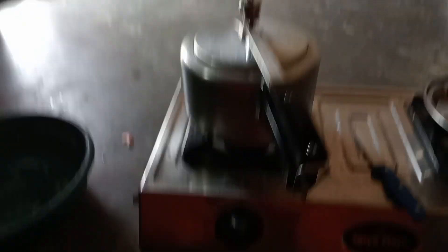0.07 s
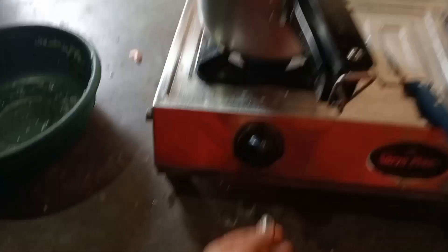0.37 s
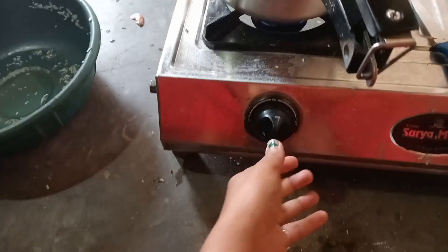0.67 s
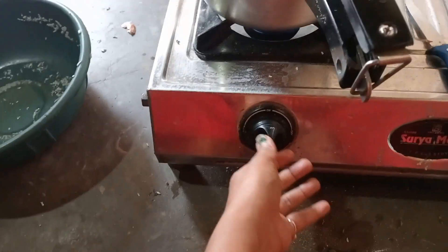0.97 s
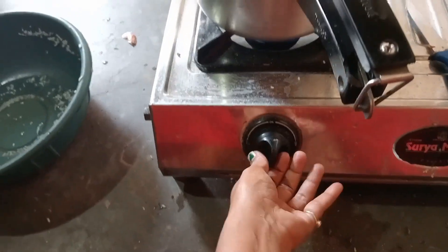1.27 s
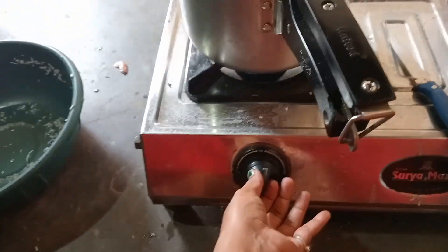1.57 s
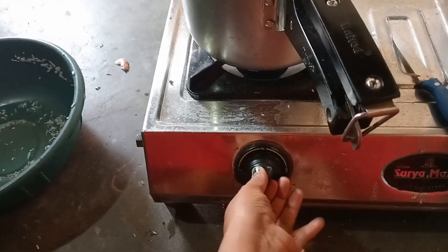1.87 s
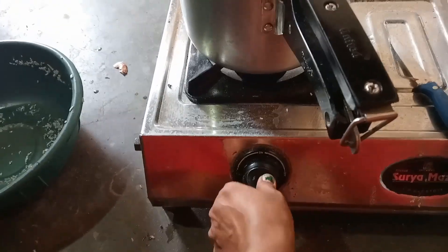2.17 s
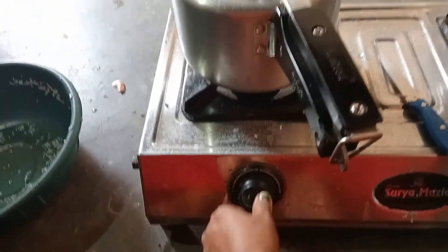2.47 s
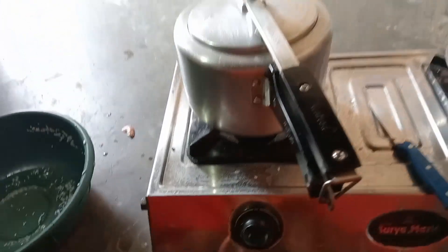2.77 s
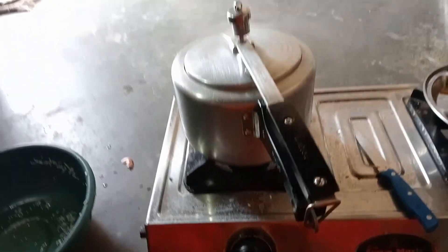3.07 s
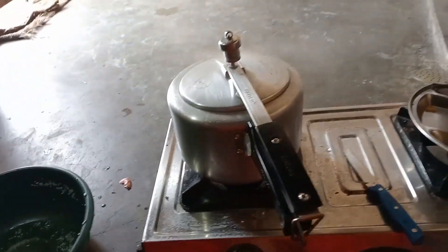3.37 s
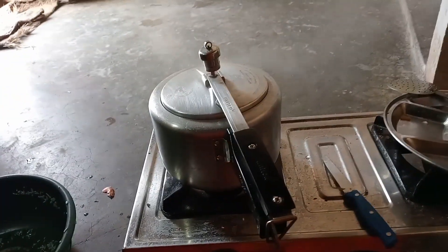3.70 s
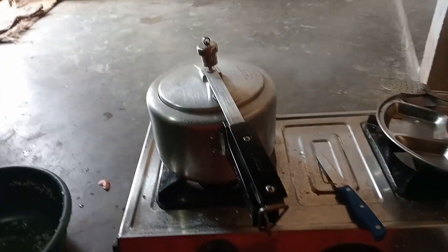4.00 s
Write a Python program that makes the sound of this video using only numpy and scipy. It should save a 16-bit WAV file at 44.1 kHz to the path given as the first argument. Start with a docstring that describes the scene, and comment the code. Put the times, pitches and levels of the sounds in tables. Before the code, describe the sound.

A loud, steady hiss of steam pours from a pressure cooker's valve from start to finish. It is sharp and airy, with a slight flutter and faint high whistling tones that come and go. The close, moving microphone catches dull little thumps of draught and extra fizz through the first three seconds, then the hiss softens slightly. A very faint low kitchen rumble lies underneath.

```python
"""A pressure cooker blows off steam under its weighted valve, on a gas stove, close to a hand-held mic.
The jet hisses through the vent's resonances and now and then almost whistles, while the valve flutters.
Nearby surfaces colour the hiss as the mic moves. Near the line of the jet the treble is brighter
and the draught buffets the mic. A faint kitchen rumble lies underneath."""
import sys
import numpy as np
from scipy import signal
from scipy.fft import rfft, irfft, next_fast_len
from scipy.io import wavfile
from scipy.ndimage import uniform_filter1d, map_coordinates

SR = 44100
rng = np.random.default_rng(int(sys.argv[2]) if len(sys.argv) > 2 else 0)


def transcribe(u):
    """Save the signal u as a 16-bit wav file named by the first command-line argument.

    u: samples, shape (n,) or (channels, n), limited to [-1, 1]; the rate is SR.
    q: integer samples, one column per channel.
    """
    v = np.clip(np.atleast_2d(u).T, -1, 1)
    q = np.round(v * 32767).astype(np.int16)
    wavfile.write(sys.argv[1], SR, q)


N = 187028

# How hard the jet blows. Each row: time in seconds, level in dB.
JET_LEVEL = [(0.0, -21), (0.13, -18.5), (1.2, -19), (2.0, -20), (2.7, -18.5), (3.3, -19.5), (4.24, -20.5)]
# The tone of the hiss. Each row: frequency in Hz, relative level in dB.
HISS_SPECTRUM = [(20, -72), (400, -39), (1100, -22), (1600, -17), (2200, -17), (2600, -8.5), (3050, -3.5),
                 (3700, -3.5), (5300, -3.5), (5850, -1), (7000, -2), (8000, -6), (9800, -17),
                 (11300, -15.5), (13000, -22.5), (15500, -24)]
# Brief dips in the jet's level. Each entry: centre in seconds.
DIP_TIMES = [.6, 4.3, 3.935]
def steam_jet():
    """Turbulent steam hisses out under the weight and sets vent, valve and lid ringing."""
    dip_db, dip_length_s = 2.2, 0.014
    jet_db = curve(JET_LEVEL) - dip_db * sum(swell(s, dip_length_s) for s in DIP_TIMES)
    hiss = amp(jet_db - 1.1) * eddies(noise(HISS_SPECTRUM), depth_db=1.61)
    ringing = amp(jet_db) * (vent_resonances() + valve_tones())
    return room(reflections(hiss, drift_s=0.0001346), wet_db=-14.5, t60=0.17) + ringing


def vent_resonances():
    """Two broad vent resonances: the low one fades as the mic nears the jet, the high one sings out once."""
    wander_db, wander_rate = 1.8, 3.97
    low_gain = near(closest_db=-17.5, slope=-0.31) * amp(wander_db * wobble(wander_rate))
    low = low_gain * resonance(hz=3117, half_width=290)
    high_db = -15.5 + 7.9 * swell(centre_s=1.7, length_s=0.76) + wander_db * wobble(wander_rate)
    high = amp(high_db) * resonance(hz=6620, half_width=200)
    return low + high


# The ring of valve and lid. Each row: pitch in Hz, half-width in Hz, relative level in dB.
VALVE_MODES = [(3976, 23, -17), (4976, 30, -16), (5410, 22, -21), (5720, 19, -19), (5935, 12, -11.5),
               (6050, 20, -12.5), (6360, 32, -11), (6480, 17, -18.5), (6900, 9.9, -16.5), (7080, 18, -14.5),
               (7490, 16, -20), (8752, 40, -16)]
def valve_tones():
    """Narrow resonances of the valve and lid, each swelling and fading on its own."""
    trim_db, wander_db = -5.0, 3
    return sum(amp(db + trim_db + wander_db * wobble(rate=5.5)) * resonance(hz, half_width)
               for hz, half_width, db in VALVE_MODES)


# Fleeting whistles. Each row: centre in seconds, length in seconds, pitch in Hz, relative level in dB.
WHISTLE_NOTES = [(0.298, 0.19, 3580, -29.5), (0.556, 0.058, 6230, -24), (0.615, 0.079, 4120, -31),
                 (0.807, 0.07, 5900, -30), (0.967, 0.032, 6380, -24), (1.13, 0.055, 6640, -26),
                 (1.6, 0.092, 5420, -30), (2.228, 0.027, 6680, -24), (2.48, 0.4, 6660, -27),
                 (3.31, 0.13, 6110, -35), (3.32, 0.15, 5720, -28), (3.49, 0.1, 3160, -30)]
def whistles():
    """For a moment the jet locks on to one slightly jittery pitch."""
    out = np.zeros(N)
    for centre_s, length_s, hz, db in WHISTLE_NOTES:
        pitch_hz = hz + 55 * wobble(rate=220)
        out += amp(db + 3.0) * swell(centre_s, length_s) * np.sin(2 * np.pi * np.cumsum(pitch_hz) / SR)
    return out


# Midrange rush, bright spray and airy fizz. Each row: frequency in Hz, relative level in dB.
RUSH_SPECTRUM = [(20, -68), (500, -11), (1200, -6), (1800, 2.5), (2500, 3), (3500, -23), (6000, -41)]
SPRAY_SPECTRUM = [(1000, -80), (6500, -47), (8000, -5), (9500, 2), (10700, -5.5), (12000, -13.5),
                  (15500, -35)]
FIZZ_SPECTRUM = [(4000, -80), (12000, -28), (13100, -10), (13600, -6), (14300, 3), (14900, 0), (15250, -1)]
def plume():
    """Three bands of turbulence, strongest close to the line of the jet."""
    rush = near(closest_db=-33.5, slope=1.06) * eddies(noise(RUSH_SPECTRUM), depth_db=3.0)
    spray = near(closest_db=-27, slope=1.24) * eddies(noise(SPRAY_SPECTRUM), depth_db=2.5)
    flicker = amp(2.2 * wobble(rate=7))
    fizz = near(closest_db=-36, slope=2.2) * flicker * eddies(noise(FIZZ_SPECTRUM), depth_db=3.0)
    return room(rush + spray + fizz, wet_db=-18, t60=0.22)


# Puffs of air on the mic. Each row: centre in seconds, length in seconds, level in dB.
DRAUGHT_PUFFS = [(0.118, 0.045, -37.5), (0.344, .06, -34), (.49, 0.039, -32), (.73, 0.039, -32),
                 (0.975, 0.11, -31.5), (1.22, 0.036, -34), (1.404, 0.041, -34.5), (1.837, 0.061, -39),
                 (2.091, 0.031, -33), (2.264, 0.036, -30), (2.49, 0.13, -36.5), (2.605, 0.039, -33.5),
                 (2.906, 0.014, -33.5), (3.612, 0.015, -41.5)]
# The dull thud of the buffeting. Each row: frequency in Hz, relative level in dB.
BUFFET_SPECTRUM = [(20, -34), (35, -17), (50, -15), (77, -4), (160, -0.5), (450, -1.5), (800, -3),
                   (1300, -6.5), (2200, -14.5), (4000, -32)]
def draught():
    """Small eddies hit the mic as pressure spikes over a soft rumble; puffs add to a restless flow."""
    spikes_per_s = 190
    flow = near(closest_db=-34.5, slope=1.36) * amp(1.77 * wobble(rate=17))
    puff_power = sum((amp(db) * swell(s, length)) ** 2 for s, length, db in DRAUGHT_PUFFS)
    strength = np.sqrt(flow ** 2 + puff_power)
    sizes = rng.choice([-1, 1], N) * amp(2.9 * rng.standard_normal(N))
    spikes = unit((rng.random(N) < spikes_per_s / SR) * sizes)
    rumble = amp(1.6 * wobble(rate=120)) * rng.standard_normal(N)
    return strength * coloured(spikes + amp(-3) * rumble, BUFFET_SPECTRUM)


# The mic's path past the line of the jet. Each row: time in seconds, closeness in dB (0 is closest).
MIC_CLOSENESS = [(0.0, -8.5), (0.2, -6.5), (0.35, -3), (0.52, -3), (0.63, -.3), (.82, -1.2), (1.05, -0.5),
                 (1.23, -0.1), (1.33, -2), (1.6, -4), (1.78, 0), (2.15, -4.5), (2.6, -2), (2.9, -4.5),
                 (3.45, -8.5), (4.24, -9.5)]
def near(closest_db, slope):
    """A layer's gain as the mic moves: slope dB for each dB of closeness."""
    return amp(closest_db + slope * curve(MIC_CLOSENESS))


# Bounces off counter, stove and wall. Each row: delay in seconds, gain as a factor.
SURFACE_ECHOES = [(.0019, 0.18), (.0043, 0.12), (.0081, 0.25), (0.014, 0.23)]
def reflections(x, drift_s):
    """Adds short echoes whose paths slowly change as the mic moves."""
    echoes = np.zeros(N)
    for delay_s, gain in SURFACE_ECHOES:
        lag = SR * (delay_s + drift_s * wobble(rate=1.194))
        echoes += gain * map_coordinates(x, [np.arange(N) - lag], mode="mirror")
    return x + echoes


def room(x, wet_db, t60):
    """The hard kitchen's diffuse echo carves fine peaks and notches into the hiss."""
    t = np.arange(SR // 4) / SR
    tail = rng.standard_normal(len(t)) * amp(-60 * t / t60)
    padded = np.pad(x, (len(t) - 1, 0), "wrap")
    return x + amp(wet_db) * signal.fftconvolve(padded, tail / np.linalg.norm(tail), "valid")


# The kitchen's room tone. Each row: frequency in Hz, relative level in dB.
KITCHEN_SPECTRUM = [(20, -38), (45, -17), (80, -7), (250, 10), (900, -1), (2000, -10)]
def kitchen_tone():
    """A faint, steady bed of low noise."""
    return amp(-55.0) * noise(KITCHEN_SPECTRUM)


def eddies(x, depth_db):
    """Passing eddies lift and drop patches of the spectrum; rms 1."""
    spectrogram = signal.stft(x, nperseg=1024)[2]
    patches = rng.standard_normal(spectrogram.shape)
    for _ in range(2):
        patches = uniform_filter1d(uniform_filter1d(patches, size=4, axis=0), size=8, axis=1)
    return unit(signal.istft(spectrogram * amp(depth_db * unit(patches)), nperseg=1024)[1][:N])


def resonance(hz, half_width):
    """Turbulence ringing in one steep-sided resonance, at rms 1."""
    return unit(filtered(rng.standard_normal(N), lambda f: 1 / (1 + 1j * (f - hz) / half_width) ** 2))


def noise(spectrum):
    """Noise with a (Hz, dB) spectrum, at rms 1."""
    return coloured(rng.standard_normal(N), spectrum)


def coloured(x, spectrum):
    """x through a (Hz, dB) spectrum, at rms 1."""
    f, db = np.transpose(spectrum)
    return unit(filtered(x, lambda hz: amp(np.interp(np.log(hz + 1), np.log(f + 1), db))))


def filtered(x, response):
    """x through a frequency response."""
    size = next_fast_len(N + 8192)
    return irfft(rfft(x, size) * response(np.fft.rfftfreq(size, 1 / SR)), size)[..., :N]


def swell(centre_s, length_s):
    """A bell-shaped rise to 1 and fall."""
    return np.exp(-2 * ((np.arange(N) / SR - centre_s) / length_s) ** 2)


def wobble(rate):
    """A smooth random curve with rate knots a second."""
    return map_coordinates(rng.standard_normal(4096), [np.arange(N) * rate / SR], mode="wrap")


def curve(rows):
    """Straight lines through (seconds, value) points."""
    return np.interp(np.arange(N) / SR, *np.transpose(rows))


def amp(db):
    return 10 ** (np.asarray(db) / 20)


def unit(x):
    return x / np.sqrt(np.mean(x ** 2) + 1e-20)


def scene():
    """The valve's flutter shakes all of the steam sound; both channels are alike."""
    flutter = amp(0.34 * wobble(rate=35.23))
    mono = flutter * (steam_jet() + whistles() + plume()) + draught() + kitchen_tone()
    return np.array([mono, mono])


def record(dry):
    """A brick-wall low-pass cuts the very top of the treble."""
    return filtered(dry, lambda hz: hz < 15530)


dry = scene()
out = record(dry)
transcribe(out)
```